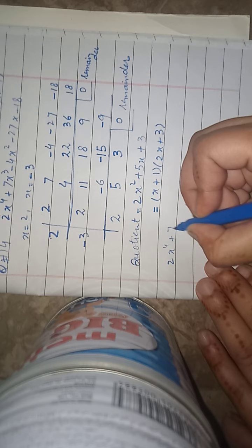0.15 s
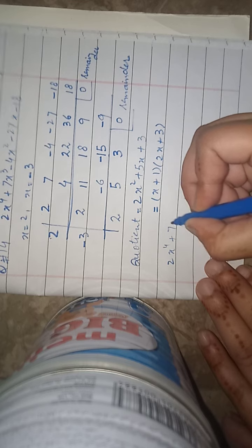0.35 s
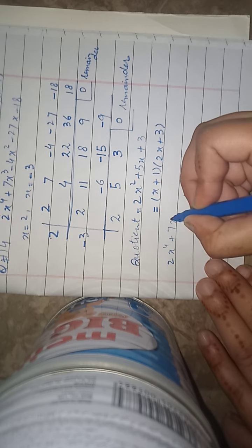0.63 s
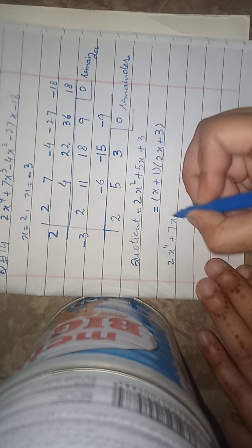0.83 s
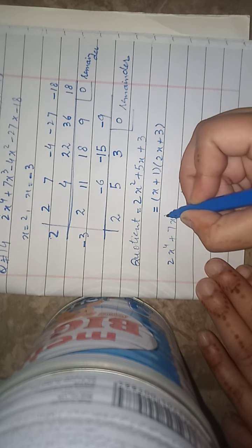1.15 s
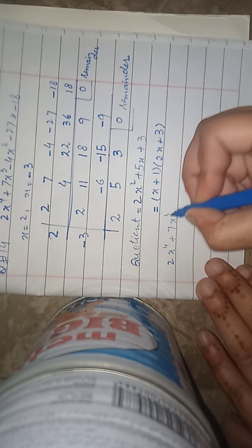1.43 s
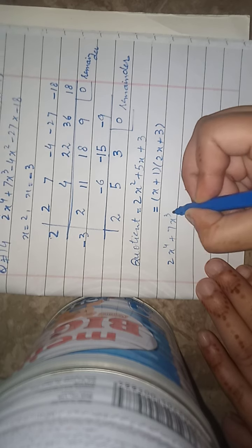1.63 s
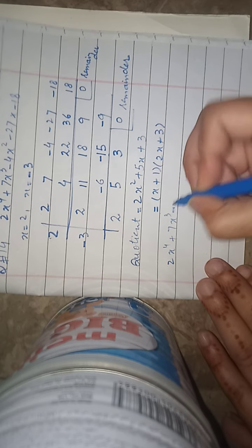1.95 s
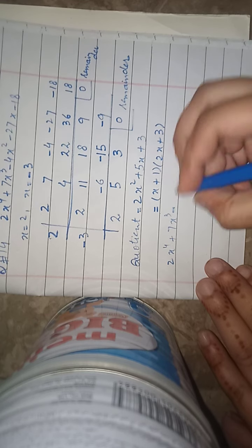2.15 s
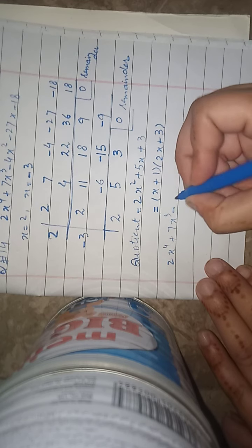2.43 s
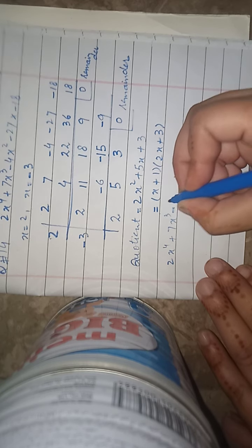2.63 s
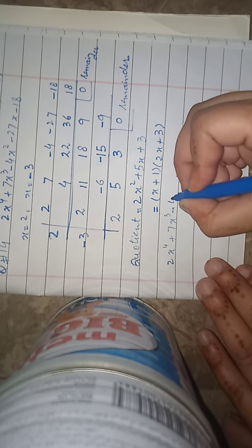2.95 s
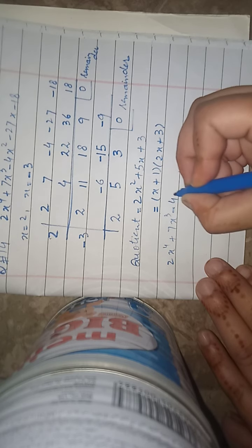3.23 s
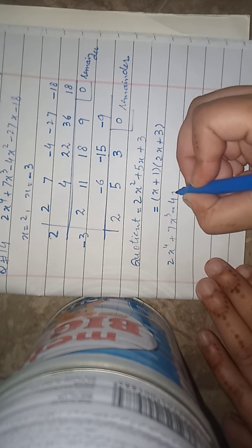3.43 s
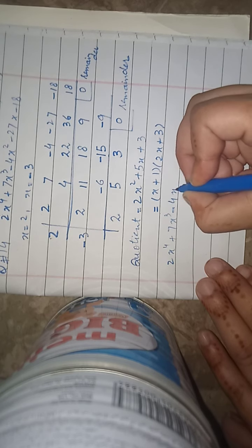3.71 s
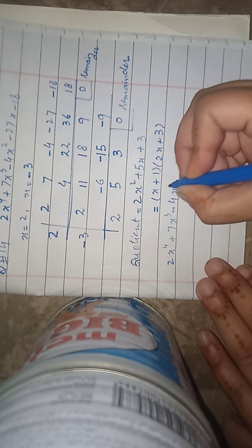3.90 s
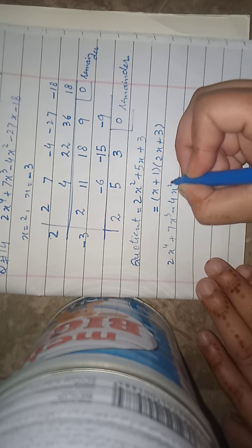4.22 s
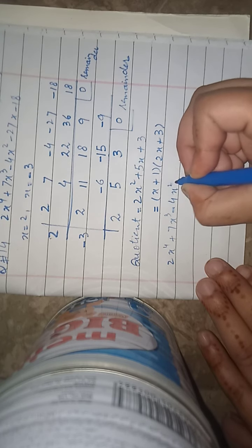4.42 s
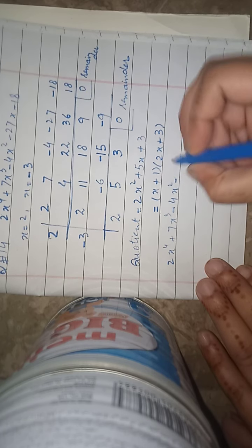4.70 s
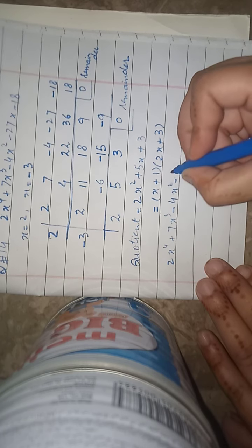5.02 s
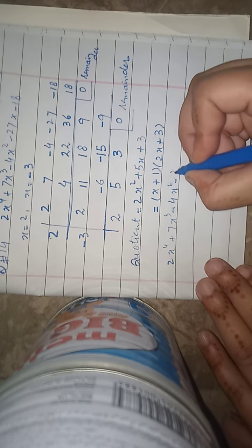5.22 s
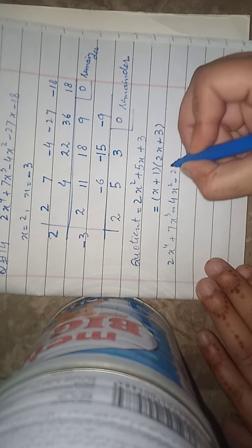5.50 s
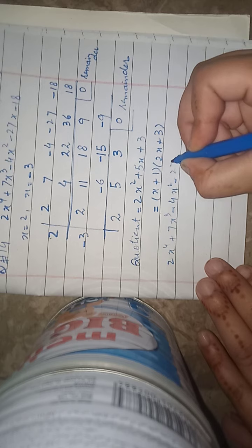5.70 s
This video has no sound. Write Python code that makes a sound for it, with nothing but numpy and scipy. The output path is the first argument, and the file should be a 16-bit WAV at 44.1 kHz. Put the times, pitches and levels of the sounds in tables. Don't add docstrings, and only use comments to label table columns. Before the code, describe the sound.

An electric fan runs without pause in a quiet room, heard on a phone microphone. Its low blade hum flutters gently over a soft motor hum and an even, dark rush of air coloured by the walls. Someone writes on paper, but only one tiny pen tick surfaces, a little after five seconds.

```python
import sys
import numpy as np
from scipy import signal
from scipy.fft import rfft, irfft
from scipy.io import wavfile
from scipy.ndimage import uniform_filter1d

SR = 44100
rng = np.random.default_rng(int(sys.argv[2]) if len(sys.argv) > 2 else 0)


def voltage_ratio(level):
    return 10 ** (np.asarray(level, float) / 20)


def inscribe(sig):
    pcm = np.round(np.clip(np.atleast_2d(sig).T, -1, 1) * 32767)
    wavfile.write(sys.argv[1], SR, pcm.astype(np.int16))


N = 258205
SHAFT_HZ = 21.982
BLADE_COUNT = 6

BLADE_ORDERS = (6, 12, 18, 7)


def read(points, hz):
    point_hz, value = np.transpose(points)
    return np.interp(np.log(hz + 1), np.log(point_hz + 1), value)


def noise(density_db):
    spectrum = rfft(rng.standard_normal(N))
    return irfft(spectrum * voltage_ratio(density_db) * np.sqrt(SR / 2), N)


def drift(top_hz):
    waves = 24
    hz = top_hz * rng.standard_normal(waves)
    coarse_t = np.arange(0, N + 200, 200) / SR
    turns = np.outer(coarse_t, hz) + rng.random(waves)
    slow = np.exp(2j * np.pi * turns).sum(1) / np.sqrt(waves)
    return np.interp(np.arange(N) / SR, coarse_t, slow)


def tone(hz, db, waver, waver_hz=1.2, lead_turns=0):
    waver = np.clip(waver, 0, 1)
    height = np.sqrt(1 - waver ** 2) + waver * drift(waver_hz)
    turns = hz * np.arange(N) / SR + lead_turns
    return np.sqrt(2) * voltage_ratio(db) * (height * np.exp(2j * np.pi * turns)).real


def locked(order):
    # time in seconds, Hz off the mean speed.
    creep = [
        (0, -.014),
        (2.8, -.008),
        (3.6, .004),
        (5.86, .016),
    ]
    start_turn, pulse_lag_turn, uneven_turn = -.062, -.1, .11
    crept_turns = np.cumsum(np.interp(np.arange(N) / SR, *np.transpose(creep))) / SR
    off = order - BLADE_COUNT * round(order / BLADE_COUNT)
    return order * (start_turn + crept_turns) + pulse_lag_turn + uneven_turn * off ** 2


def blades():
    # resting level in dB, flutter from 0 to 1, eddy length in seconds.
    blade_tones = [(-31.5, 0.17, 0.18), (-41.5, 0.3, 0.23), (-38.5, 0.25, 0.22), (-41, 0.45, 0.19)]
    # time in seconds, lift in dB.
    eddy_lists = [
        [(.14, 6.5), (1.15, 4.5), (1.7, -3), (1.98, 3), (3.2, 3.5), (3.45, 4.5), (4.3, -3), (4.8, 3),
         (5.27, 4.5), (5.52, 4.5)],
        [(.2, -4.5), (.62, 8.5), (2.14, 4), (2.67, 10), (3.12, 9), (3.77, 7)],
        [(.12, 6), (.4, 5), (.7, 4), (1.19, 8.5), (1.92, 3), (2.62, 4), (3.29, -14), (4.33, 4.5)],
        [(.05, -12), (.62, 3.5), (1.06, 7), (1.38, 6), (2.85, 5), (3.07, -11)],
    ]
    t = np.arange(N) / SR
    out = np.zeros(N)
    for order, (db, flutter, length_s), eddies in zip(BLADE_ORDERS, blade_tones, eddy_lists):
        swell_db = np.zeros(N)
        for middle_s, lift_db in eddies:
            swell_db += lift_db * np.exp(-(2 * (t - middle_s) / length_s) ** 2)
        out += tone(order * SHAFT_HZ, db + swell_db, flutter, waver_hz=7.0, lead_turns=locked(order))
    return out


def shaft():
    weak_multiples = (2, 3, 4, 5, 10, 13, 14, 17, 21, 24, 25, 30, 36, 44)
    # level in dB, waver from 0 to 1.
    weak_tones = [(-69.5, .2), (-54.5, 0.2), (-52.5, 0.6), (-42.5, 0.32), (-49, 0.36), (-49.5, 0.55),
                  (-51.5, 0.4), (-50.5, 0.48), (-54, 0.25), (-47.5, 0.3), (-60.5, 0.4), (-49, 0.81),
                  (-58, .7), (-58, 0.28)]
    out = np.zeros(N)
    for order, (db, waver) in zip(weak_multiples, weak_tones):
        out += tone(order * SHAFT_HZ, db, waver, lead_turns=locked(order))
    return out


def motor():
    # frequency in Hz, level in dB, waver from 0 to 1.
    hum_tones = [(31.9, -69.5, .1), (74, -52.5, 0.4), (99.7, -45, 0), (116, -59.5, 0.4),
                 (295.3, -51.5, 0.4)]
    out = np.zeros(N)
    for hz, db, waver in hum_tones:
        out += tone(hz, db, waver, waver_hz=.6, lead_turns=rng.random())
    return out


def air():
    # frequency in Hz, strength in dB per Hz.
    rush_curve = [(8, -85), (20, -91), (50, -83), (64, -72.5), (105, -64), (165, -56.5), (300, -61),
                  (600, -62.5), (1200, -65.5), (2200, -72), (3850, -76.5), (4350, -84), (5700, -104),
                  (9800, -124)]
    # frequency in Hz, width in Hz, lift in dB.
    resonances = [(80, 5, 1), (89, 6, 2.5), (126.3, 6.6, 9.5), (147, 6.9, -10.5), (148, 8.3, -0.5),
                  (204.7, 17.5, -10.5), (212, 7.9, 1), (253, 24, 5.5), (320, 5.9, 7), (400, 4.9, 7.5),
                  (418, 9.1, 4), (472, 6.3, -6), (505, 6.3, -8.5), (532, 18, 4), (598, 36, -3.5),
                  (630, 16, 0), (667, 12, 2.5), (843, 51, 1.5), (770, 12, -1.5), (6720, 1600, 10.5),
                  (8200, 1180, 9), (8970, 600, 5.5)]
    hz = np.fft.rfftfreq(N, 1 / SR)
    room_db = sum(db / (1 + (2 * (hz - f) / width) ** 2) for f, width, db in resonances)
    ripple = rng.standard_normal(len(hz))
    for _ in range(2):
        ripple = uniform_filter1d(ripple, size=90)
    ripple_db = ripple / ripple.std() * np.interp(hz, [700, 900, 2500], [0, 1.2, .6])
    gaps_db = sum(-9 * np.exp(-((hz - order * SHAFT_HZ) / 2.3) ** 2) for order in BLADE_ORDERS)
    steep_db = -30 * np.log2(np.maximum(hz / rush_curve[-1][0], 1))
    rush = noise(read(rush_curve, hz) + room_db + ripple_db + gaps_db + steep_db)
    return rush * voltage_ratio(0.32 * drift(1.5).real)


def pen():
    # time in seconds, peak level in dB.
    pen_ticks = [
        (5.3388, -56),
    ]
    out = np.zeros(N)
    for touch_s, db in pen_ticks:
        snap_and_echo = round(touch_s * SR) + np.array([0, 1, 45, 46])
        out[snap_and_echo] = voltage_ratio(db) * np.array([1, -1, -.7, .7])
    return out


def microphone_hiss():
    # frequency in Hz, strength in dB per Hz.
    hiss_curve = [(5000, -124), (10000, -123.5), (10900, -126), (11600, -126), (12600, -128.5),
                  (15400, -126)]
    return noise(read(hiss_curve, np.fft.rfftfreq(N, 1 / SR)))


def scene():
    return (blades() + shaft() + motor() + air() + pen())[None]


def band_limit(x):
    return signal.sosfilt(signal.butter(12, 15525, fs=SR, output="sos"), x)


def record(dry):
    close_s = .0001
    left_s = np.arange(N, 0, -1) / SR
    close = np.sin(np.pi / 2 * np.minimum(left_s / close_s, 1)) ** 2
    return band_limit((dry + microphone_hiss()) * close)


dry = scene()
out = record(dry)
inscribe(out)
```